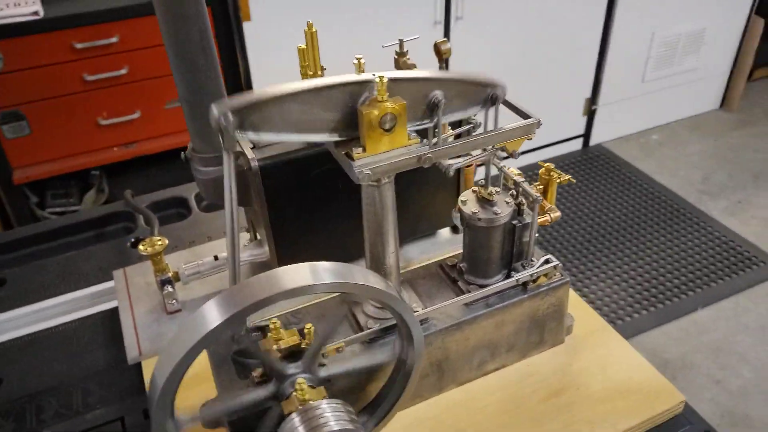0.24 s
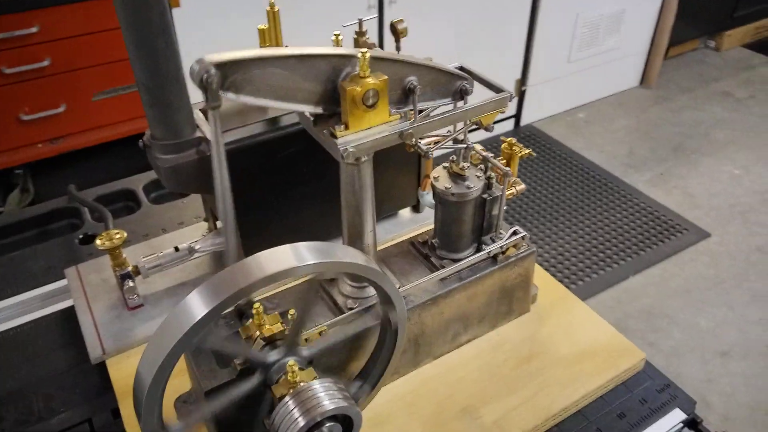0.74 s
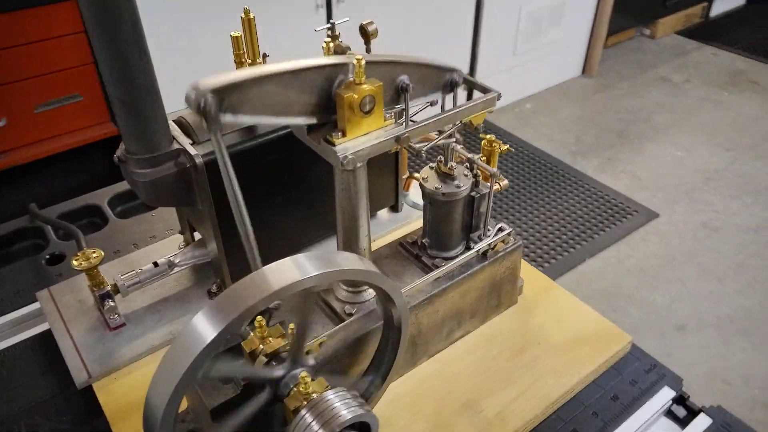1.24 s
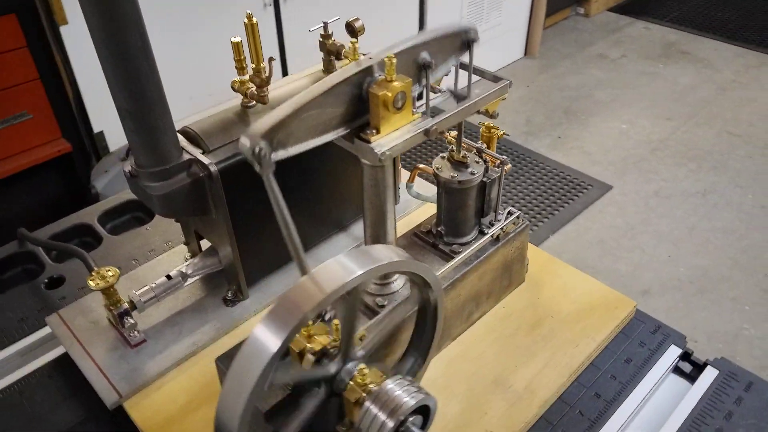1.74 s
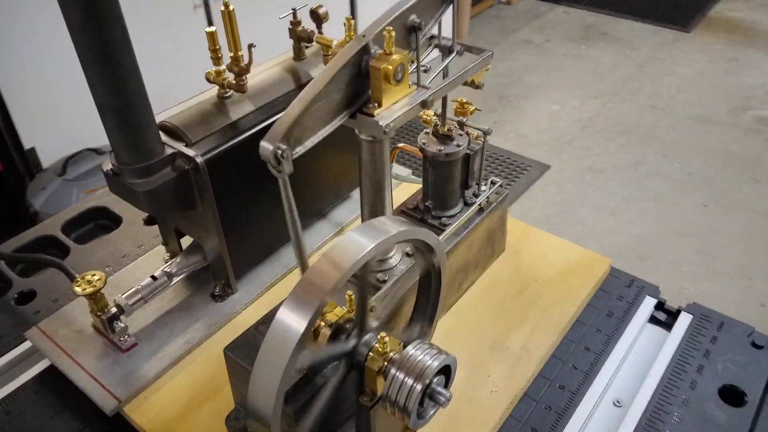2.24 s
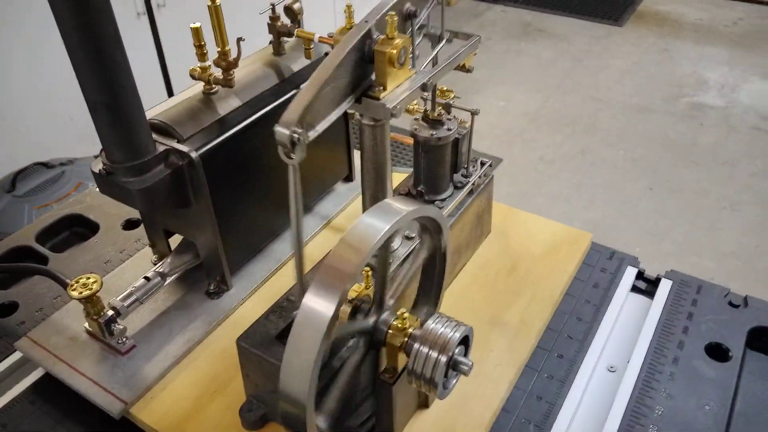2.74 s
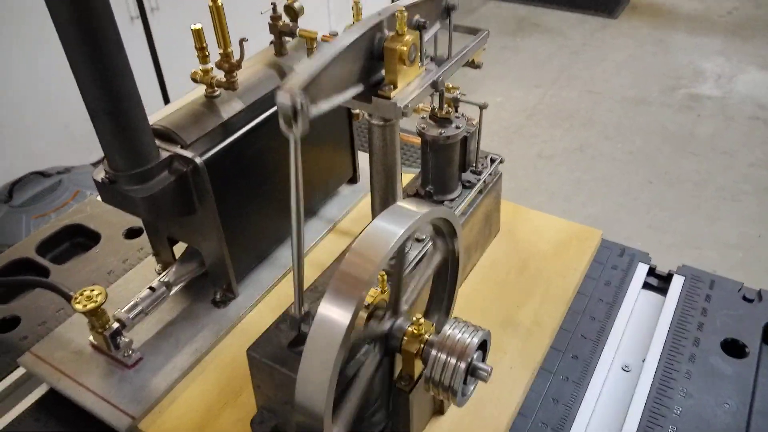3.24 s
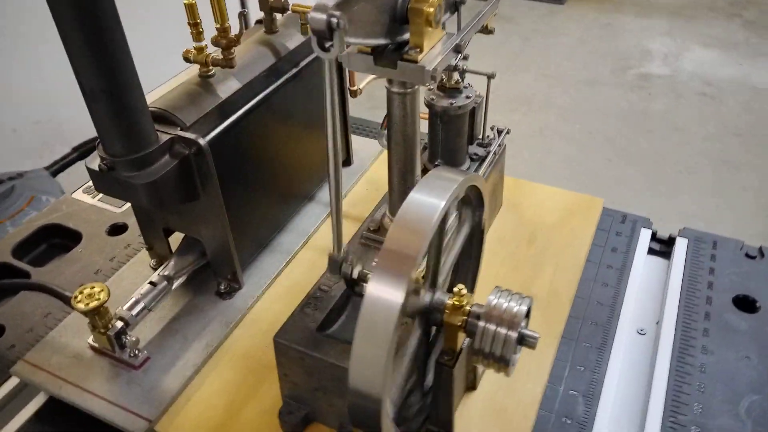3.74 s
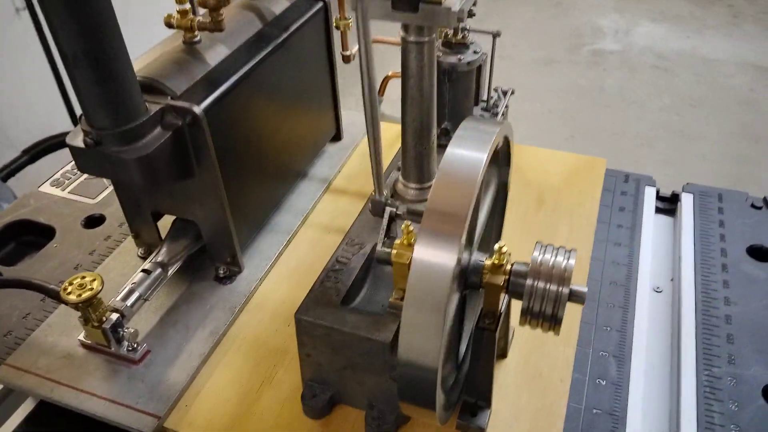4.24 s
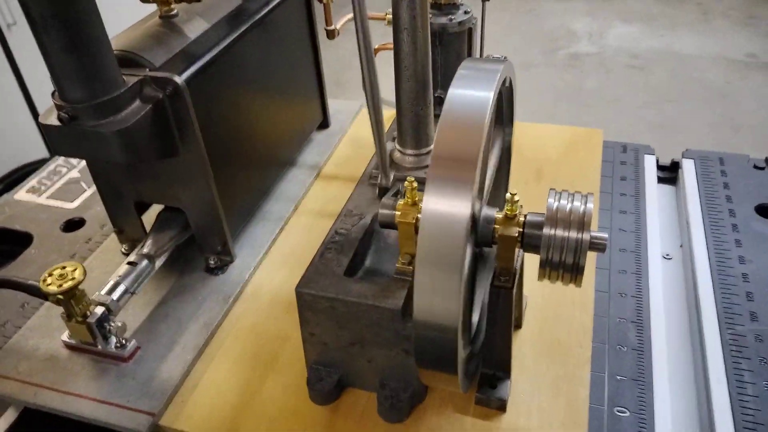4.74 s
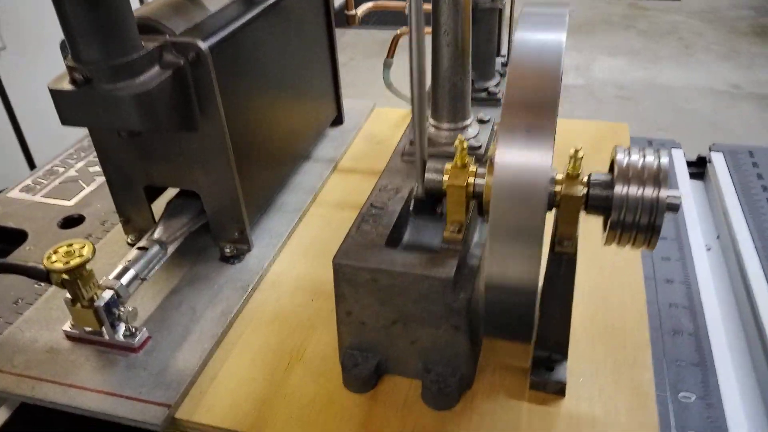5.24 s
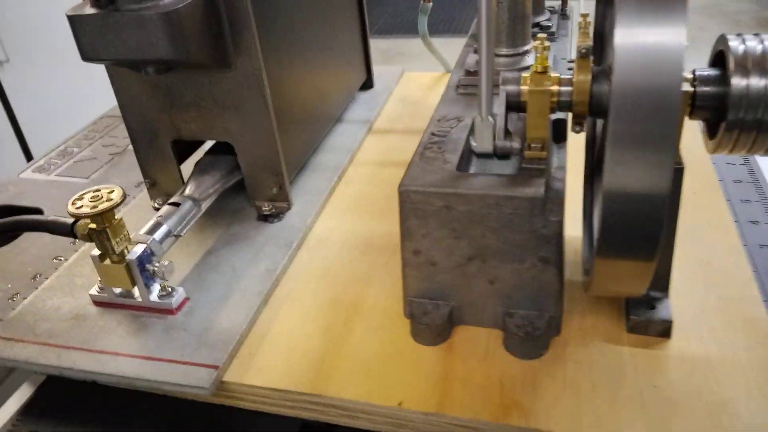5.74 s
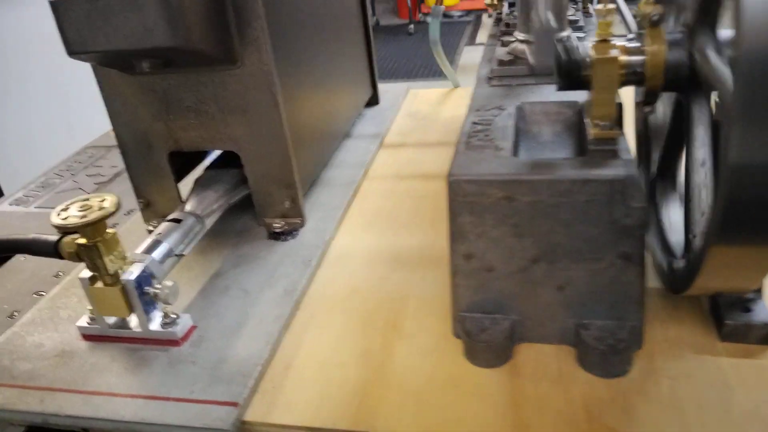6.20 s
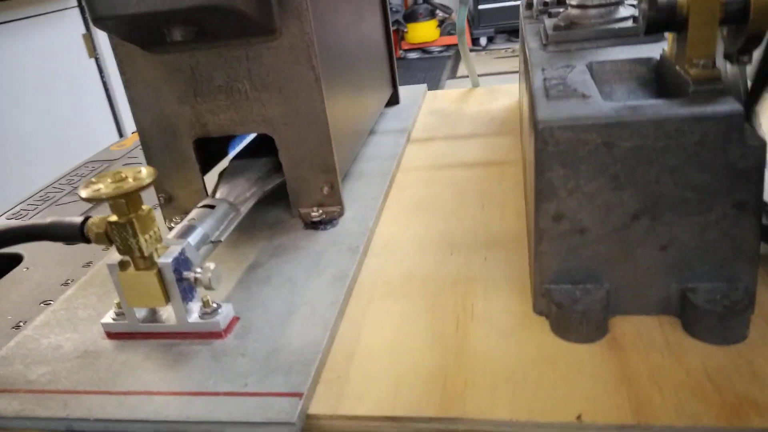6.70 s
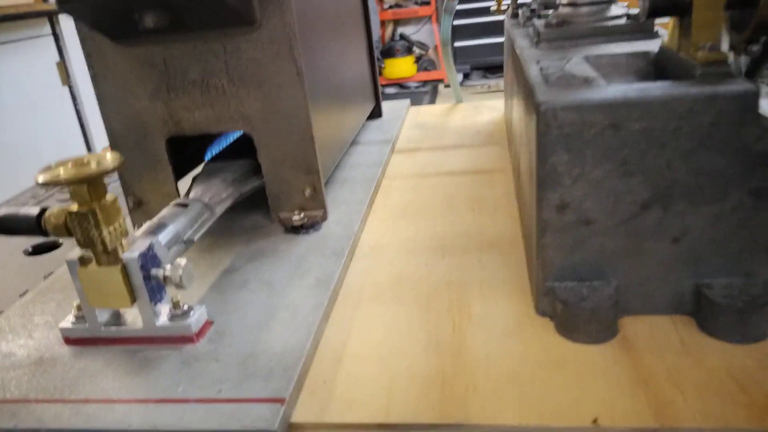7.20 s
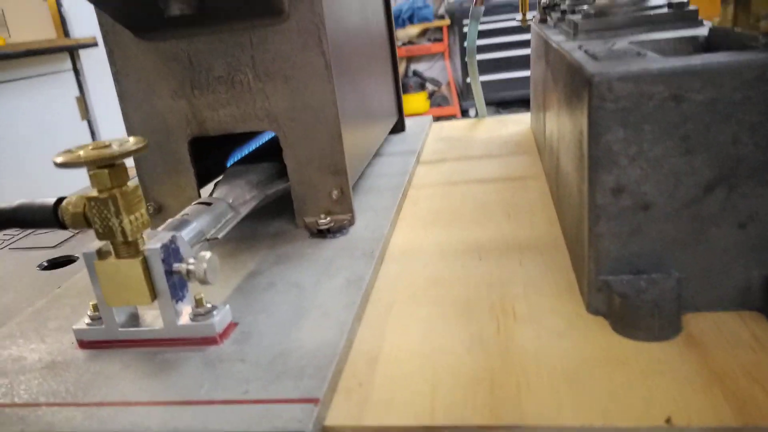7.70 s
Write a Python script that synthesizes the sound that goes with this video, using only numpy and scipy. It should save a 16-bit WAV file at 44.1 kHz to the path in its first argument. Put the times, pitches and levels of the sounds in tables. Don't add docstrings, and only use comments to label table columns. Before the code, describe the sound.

A gas burner hisses steadily and brightly in a workshop while a small steam engine ticks, knocks and faintly puffs; shoes scuff the concrete floor.

```python
import sys
import numpy as np
from scipy import signal
from scipy.fft import rfft, irfft
from scipy.io import wavfile
from scipy.ndimage import uniform_filter1d

SR = 44100
rng = np.random.default_rng(int(sys.argv[2]) if len(sys.argv) > 2 else 0)


def pcm_store(signal):
    levels = np.round(np.clip(np.atleast_2d(signal), -1, 1) * 32767)
    wavfile.write(sys.argv[1], SR, levels.astype(np.int16).T)


def amplitude_ratio(level_db):
    exponent = np.asarray(level_db, float) / 20
    return 10 ** exponent


N = 351036
FRAME = 1024


def unit(x):
    return x / np.sqrt(np.mean(np.abs(x) ** 2) + 1e-20)


def along(points, hz):
    f, v = np.transpose(points)
    return np.interp(np.log(hz + 1), np.log(f + 1), v)


def curves(rows, t):
    s, *cols = np.transpose(rows)
    return [np.interp(t, s, c) for c in cols]


def frames(x):
    hz, t, z = signal.stft(x, SR, nperseg=FRAME, noverlap=FRAME * 5 // 8)
    return hz[:, None], t, z


def samples(z):
    return signal.istft(z, SR, nperseg=FRAME, noverlap=FRAME * 5 // 8)[1][..., :N]


def patches(shape, bins, steps):
    field = rng.standard_normal(shape)
    for _ in range(2):
        field = uniform_filter1d(field, bins, axis=-2)
        field = uniform_filter1d(field, steps, axis=-1)
    return unit(field)


def glide(row, hz, t, fade_s):
    start, end, hz0, hz1, width_hz = row[:5]
    fade = np.clip(np.minimum(t - start, end - t) / fade_s + 0.5, 0, 1)
    on = fade > 0
    centre_hz = hz0 + (hz1 - hz0) * (t[on] - start) / (end - start)
    return on, fade[on], (hz - centre_hz) / width_hz


def burner():
    # f/Hz, level/dB per Hz
    jet_spectrum = [(900, -50.5), (1800, -32.5), (2600.0, -15.5), (3300.0, -7.0), (4000.0, -2.5),
                    (4600.0, 4.5), (6000.0, -0.5), (7500.0, -3.5), (9000.0, -4.5), (12000.0, -6.0),
                    (14000.0, -3.5), (15400.0, -11.5), (15650, -14)]
    # t/s, left level/dB, left tilt/dB per octave, right level/dB, right tilt/dB per octave
    walk = [(0.0, -3.5, 8, 3.5, -8), (0.62, -6, 5.5, 5.5, -5.5), (0.69, -8.5, 14, 2.5, -2.5),
            (1.09, -11.5, 7.5, 1.3, -4.5), (1.45, -10.5, 11, 3, -6.5), (2.17, -3.5, 3.5, 5, -10.5),
            (2.89, 0, 3, 7, -8.5), (3.12, 3.8, 3, 7.5, -7.5), (3.3, -4, 7.5, 3, -4),
            (3.6, -1, 4.5, 6.5, -4.5), (4.3, -6, 6.5, 2, -2), (5.07, -3, 9.5, 6, -3),
            (5.43, -4.5, 7.5, 4.5, -5), (6.15, -1.9, 10, 5, -4), (6.7, 0, 10, 2.6, -8),
            (7.1, 1.7, 6.5, 1.5, -6), (7.6, 3.5, 3.5, 5.5, -9), (7.96, 5.5, 2, 6, -10.5)]
    # t/s, lag/ms
    lag_ms = [(0, 0.13), (1.5, 0.21), (3, 0.21), (5, 0.26), (6.3, 0.227), (7.3, 0.76), (8, 0.14)]
    # f/Hz, left level/dB, right level/dB
    shade = [(2180, 1.5, -9), (3100, 10.5, -9), (3780, 4, -8.5), (4910, 2.5, -6), (6240, 1, 3.5),
             (9360, 0.65, -3), (14150, 0.5, -4.5), (15770, 3.5, 8.5)]
    level_db, diffuse = -42, 0.13

    hz, t, z = frames(rng.standard_normal((3, N)))
    left_db, left_tilt, right_db, right_tilt = curves(walk, t)
    octaves = np.log2(np.clip(hz, 1500, None) / 7000)
    db = np.array([left_db + left_tilt * octaves, right_db + right_tilt * octaves])
    db += np.array(curves(shade, hz))
    db += fine_fringes(t) + wide_fringes(hz, t)
    db += 0.6 * octaves.clip(0) * patches((1, len(t)), bins=1, steps=5)
    jet = np.sqrt(1 - diffuse) * z[0] + np.sqrt(diffuse) * z[1:]
    half_lag_s = curves(lag_ms, t)[0] / 1000 / 2
    lag = np.exp(-2j * np.pi * hz * half_lag_s * [[[1]], [[-1]]])
    jet = jet * lag * detours(hz, t) * amplitude_ratio(along(jet_spectrum, hz) + db)
    return amplitude_ratio(level_db) * unit(samples(jet))


def detours(hz, t):
    # t/s, bench path/cm, bench strength/0-1, base path/cm, base strength/0-1
    near_left = [(0.0, 11.5, 0.2, 16.0, 0.23), (0.5, 10.9, 0.25, 16.0, 0.32), (1.0, 10.8, 0.31, 16.3, 0.25),
                 (1.49, 10.8, 0.18, 14.4, 0.03), (1.99, 9.3, 0.28, 13.5, 0.17),
                 (2.49, 8.7, 0.41, 13.3, 0.06), (2.98, 8.8, 0.24, 13.3, 0.09),
                 (3.48, 8.5, 0.27, 12.9, 0.38), (3.98, 8.2, 0.24, 12.9, 0.23),
                 (4.48, 8.9, 0.35, 12.6, 0.23), (4.97, 8.5, 0.36, 11.9, 0.16),
                 (5.47, 7.6, 0.95, 10.8, 0.72), (5.97, 7.1, 0.29, 9.7, 0.26), (6.47, 6.6, 0.35, 9.7, 0.22),
                 (6.96, 6.8, 0.57, 8.8, 0.57), (7.46, 6.8, 0.95, 9.1, 0.17), (7.96, 6.2, 0.54, 9.8, 0.38)]
    # t/s, bench path/cm, bench strength/0-1, base path/cm, base strength/0-1
    near_right = [(0.0, 4.8, 0.3, 6.3, 0.22), (0.5, 4.3, 0.48, 9.0, 0.14), (1.0, 4.3, 0.69, 8.4, 0.39),
                  (1.49, 4.2, 0.05, 8.1, 0.22), (1.99, 5.7, 0.1, 6.7, 0.35), (2.49, 9.0, 0.21, 4.6, 0.07),
                  (2.98, 9.0, 0.66, 5.1, 0.51), (3.48, 9.2, 0.75, 5.5, 0.51), (3.98, 9.1, 0.88, 5.6, 0.33),
                  (4.48, 9.1, 0.95, 5.2, 0.3), (4.97, 9.9, 0.31, 4.7, 0.15), (5.47, 11.1, 0.41, 7.3, 0.21),
                  (5.97, 10.9, 0.29, 6.7, 0.17), (6.47, 12.2, 0.42, 7.8, 0.4),
                  (6.96, 11.9, 0.11, 7.9, 0.46), (7.46, 14.7, 0.33, 7.9, 0.14),
                  (7.96, 14.3, 0.57, 8.1, 0.48)]
    echo_gain, sound_cm_per_s = 1.15, 34300
    combs = []
    for near in (near_left, near_right):
        bench_cm, bench, base_cm, base = curves(near, t)
        echoes = bench * np.exp(-2j * np.pi * hz * bench_cm / sound_cm_per_s)
        echoes = echoes + base * np.exp(-2j * np.pi * hz * base_cm / sound_cm_per_s)
        combs.append(1 + echo_gain * echoes)
    return np.array(combs)


def wide_fringes(hz, t):
    # start t/s, end t/s, first f/Hz, last f/Hz, level/dB
    broader_left = [(-0.93, 1.67, 4110.0, 3460.0, 7.0), (-0.53, 1.27, 7550.0, 7100.0, 14.5),
                    (-0.51, 0.69, 5900.0, 5300.0, 9.0), (-0.46, 2.14, 4460.0, 3810.0, 7.5),
                    (-0.41, 3.19, 5470.0, 3670.0, -4.0), (-0.25, 0.25, 8570.0, 8320.0, -12.5),
                    (-0.21, 0.59, 6660.0, 6260.0, -9.0), (-0.13, 3.47, 6530.0, 7430.0, -8.5),
                    (-0.13, 3.47, 12320.0, 11960.0, -5.5), (-0.13, 3.47, 13500.0, 14400.0, -10.5),
                    (-0.04, 3.56, 15340.0, 14980.0, 5.0), (0.24, 3.84, 13070.0, 13970.0, -8.5),
                    (0.51, 1.71, 8480.0, 7880.0, 7.5), (0.74, 3.34, 10380.0, 11680.0, -5.0),
                    (1.89, 2.39, 9110.0, 8980.0, 11.5), (1.92, 5.52, 6440.0, 7340.0, 6.0),
                    (1.95, 4.55, 4520.0, 5820.0, -7.0), (1.95, 4.55, 5470.0, 6770.0, 5.0),
                    (2.1, 5.7, 7730.0, 8630.0, -9.5), (2.19, 5.79, 4750.0, 4390.0, -3.5),
                    (2.65, 3.85, 2970.0, 3570.0, -8.0), (3.22, 6.82, 4100.0, 5900.0, 7.0),
                    (3.56, 5.36, 8730.0, 9180.0, -9.5), (4.18, 6.78, 5000.0, 5000.0, 4.0),
                    (4.34, 5.14, 9710.0, 10110.0, 13.5), (4.43, 5.23, 5810.0, 6930.0, -10.5),
                    (4.71, 5.51, 13360.0, 13160.0, -8.0), (5.07, 6.27, 11410.0, 12010.0, 8.0),
                    (5.17, 5.97, 7190.0, 8310.0, 11.0), (5.17, 8.77, 3620.0, 3620.0, -7.0),
                    (5.23, 5.73, 15140.0, 15010.0, 13.5), (5.45, 6.25, 5580.0, 6300.0, -7.5),
                    (5.57, 8.17, 7990.0, 7340.0, 7.0), (5.6, 6.1, 3990.0, 4110.0, 10.0),
                    (5.92, 6.72, 3050.0, 2970.0, 13.0), (6.22, 8.82, 4350.0, 5650.0, -5.5),
                    (6.59, 9.19, 9110.0, 8460.0, 7.0), (6.62, 7.12, 3770.0, 3640.0, 9.5),
                    (6.9, 7.4, 9810.0, 10510.0, -11.0), (7.03, 7.83, 2480.0, 3200.0, -9.0)]
    # start t/s, end t/s, first f/Hz, last f/Hz, level/dB
    broader_right = [(-0.22, 3.38, 2670.0, 2670.0, -5.5), (-0.06, 1.74, 7150.0, 7150.0, -7.0),
                     (0.05, 1.25, 3300.0, 3600.0, 8.0), (0.06, 3.66, 9020.0, 9920.0, -8.0),
                     (0.21, 2.01, 8090.0, 8270.0, -7.0), (0.24, 3.84, 6010.0, 6910.0, -6.0),
                     (0.4, 0.9, 8490.0, 8740.0, 10.5), (0.43, 4.03, 14320.0, 13420.0, -11.0),
                     (1.45, 5.05, 13710.0, 12810.0, -6.5), (1.49, 4.09, 14860.0, 15120.0, 7.0),
                     (1.54, 2.74, 5620.0, 5740.0, -6.0), (1.74, 2.54, 7520.0, 7120.0, 11.0),
                     (1.82, 5.42, 11110.0, 11110.0, -4.5), (2.29, 3.09, 10260.0, 10060.0, 12.0),
                     (2.35, 4.15, 3360.0, 3360.0, -9.0), (2.35, 4.15, 7830.0, 8010.0, -11.0),
                     (2.35, 4.15, 8650.0, 9100.0, -5.0), (2.38, 5.98, 5250.0, 5610.0, 3.5),
                     (3.0, 4.8, 6310.0, 5410.0, 9.0), (3.49, 4.69, 5020.0, 6700.0, 6.5),
                     (3.49, 7.09, 4930.0, 4030.0, -6.0), (3.62, 6.22, 2800.0, 4100.0, 5.0),
                     (4.18, 6.78, 8910.0, 10210.0, 8.0), (4.3, 4.8, 4870.0, 5120.0, -11.5),
                     (4.52, 8.12, 12180.0, 10380.0, 9.5), (4.67, 6.47, 3840.0, 5460.0, -5.0),
                     (5.04, 6.84, 8120.0, 7220.0, 9.5), (5.11, 7.71, 11330.0, 10030.0, 8.5),
                     (5.2, 7.8, 14880.0, 14230.0, -8.0), (5.25, 6.45, 13580.0, 13460.0, 9.5),
                     (5.26, 8.86, 6810.0, 6450.0, -7.0), (5.27, 6.07, 5730.0, 6850.0, -7.5),
                     (6.29, 7.09, 8080.0, 8280.0, -10.0), (6.34, 6.84, 6660.0, 6780.0, 13.0),
                     (6.34, 8.14, 15300.0, 14850.0, 11.0), (6.53, 7.03, 9690.0, 9440.0, 14.0),
                     (6.72, 8.52, 4790.0, 6410.0, -8.0), (6.81, 7.31, 5900.0, 6150.0, 10.0),
                     (7.11, 8.31, 3120.0, 3420.0, 8.0), (7.18, 7.68, 8390.0, 8140.0, 12.0)]
    # start t/s, end t/s, first f/Hz, last f/Hz, level/dB
    narrower_left = [(-0.2, 1.4, 2240, 2240, -8.0), (-0.05, 0.95, 3960, 4060, -10.5),
                     (-0.05, 0.95, 7410, 7310, -11.5), (0.1, 1.1, 5510, 5610, -9.5),
                     (0.1, 1.1, 9560, 9460, 12.5), (0.1, 2.5, 6200, 6200, 7.5),
                     (1.15, 4.55, 8790, 9640, -5.5), (1.45, 2.45, 6980, 7080, 8.5),
                     (1.45, 4.85, 2150, 2150, -7.5), (2.8, 3.8, 4570, 4670, -7.5),
                     (3.7, 6.1, 4050, 4290, 5.5), (4.15, 7.55, 5770, 6620, 6.5), (4.3, 5.9, 8270, 8670, 9.0),
                     (4.6, 7.0, 5250, 6450, 5.5), (5.2, 6.8, 2150, 2310, 6.5), (5.2, 8.6, 8100, 7250, -5.5),
                     (5.2, 6.2, 7300, 8500, -7), (6.3, 7.7, 9000, 12000, -8), (2.3, 3.4, 9900, 9700, -7),
                     (6.2, 7.3, 4400, 4600, 5)]
    # start t/s, end t/s, first f/Hz, last f/Hz, level/dB
    narrower_right = [(-0.2, 3.2, 9820.0, 10160.0, -8.5), (-0.05, 0.95, 8180.0, 8680.0, -11.0),
                      (0.55, 2.95, 4650.0, 4050.0, -5.5), (2.05, 4.45, 3450.0, 3690.0, 5.0),
                      (2.8, 5.2, 6460.0, 5260.0, -5.5), (4.9, 7.3, 8270.0, 7070.0, -5.5),
                      (5.35, 7.75, 6980.0, 8180.0, -8.0), (5.5, 8.9, 2500.0, 2160.0, -6.5),
                      (5.8, 7.4, 3190.0, 3190.0, 6.0), (6.25, 7.85, 5940.0, 6340.0, -11.0),
                      (6.4, 8.8, 10590.0, 10830.0, -10.0), (6.85, 7.45, 6720.0, 6870.0, 11.5),
                      (6.85, 8.45, 9300.0, 10740.0, -10.5), (4.3, 5.3, 6700, 7500, 5),
                      (6.2, 7.3, 4500, 4700, 5)]
    # start t/s, end t/s, first f/Hz, last f/Hz, level/dB
    thin = [
        (2, 4.6, 3400, 3450, -6),
        (2, 4, 3130, 3100, -7),
        (1.9, 3.3, 4780, 4760, -8),
        (.2, 1, 5750, 5750, -6),
        (5.3, 6.8, 3600, 3680, -7),
        (6.1, 7.6, 3950, 4150, -6),
        (3.6, 5.3, 2330, 2330, -9),
    ]
    db = np.array([fringes(rows, 240, hz, t) for rows in (broader_left, broader_right)])
    db += [fringes(rows, 170, hz, t) for rows in (narrower_left, narrower_right)]
    return db + fringes(thin, 110, hz, t)


def fringes(rows, width_hz, hz, t):
    db = np.zeros((len(hz), len(t)))
    for start, end, hz0, hz1, depth_db in rows:
        on, fade, off = glide((start, end, hz0, hz1, width_hz), hz, t, fade_s=0.3)
        db[:, on] += depth_db * fade * np.exp(-off ** 2)
    return db


def fine_fringes(t):
    # t/s, left factor, right factor
    stretch = [(0, 1, 1), (4.3, 1.06, 1), (5.2, 1.15, 1.04), (8, 1.7, 1.3)]
    depth_db = 4.6
    fields = patches((2, FRAME // 2 + 1, len(t)), bins=2, steps=30)
    rows = np.arange(FRAME // 2 + 1)[:, None]
    fields = [np.take_along_axis(field, (rows / factor).astype(int), axis=0)
              for field, factor in zip(fields, curves(stretch, t))]
    return depth_db * np.minimum(fields, 0.5)


def gear():
    lump_db = 4
    lumps = np.interp(np.linspace(0, 1100, N), np.arange(1200), rng.standard_normal(1200))
    hz, t, z = frames(unit(amplitude_ratio(lump_db * lumps) * rng.standard_normal(N)))
    power = np.zeros(z.shape)
    for row in strokes():
        on, fade, off = glide(row, hz, t, fade_s=0.098)
        power[:, on] += amplitude_ratio(row[5] + 27.5) ** 2 * fade ** 2 * np.exp(-off ** 2)
    grain_db = lump_db * patches(z.shape, bins=3, steps=3) - 2.5
    return samples(np.sqrt(power) * amplitude_ratio(grain_db) * z)


def strokes():
    # start t/s, length/s, level/dB
    puffs = [(0.738, 0.22, -77.5), (2.18, 0.18, -78), (2.522, 0.14, -81.5), (2.878, 0.22, -78.5),
             (3.718, 0.19, -76), (4.56, 0.19, -79), (5.034, 0.42, -77.5), (6.264, 0.13, -78.5),
             (6.519, 0.28, -71), (7.002, 0.79, -80), (7.767, 0.13, -68.5)]
    # start t/s, length/s, f/Hz, level/dB
    rubs = [(.08, 0.11, 1630, -76.5), (.3, 0.67, 1250, -81), (.98, 0.29, 870, -85), (1.44, 0.1, 910, -85.5),
            (1.66, 0.22, 1330, -80.5), (2.34, 0.4, 1650, -87.5), (2.62, 0.23, 1060, -88),
            (2.97, 0.096, 1730, -78), (3.15, 0.16, 1340, -80.5), (3.5, 0.21, 1820, -89.5),
            (4.57, 0.17, 805, -84.5), (4.98, 0.12, 1180, -81), (5.73, 0.13, 980, -84.5),
            (6.05, 0.14, 1040, -80), (6.35, 0.31, 1240, -83.5), (6.68, 0.24, 665, -85),
            (7.03, 0.56, 1135, -83.5), (7.58, 0.47, 1130, -76.5)]
    # start t/s, length/s,
    # f/Hz, level/dB
    sings = [(.37, 0.18, 1010, -68.5), (.72, 0.2, 1004, -69), (1.07, 0.22, 2510, -75.5),
             (1.9, 0.19, 1010, -72), (2.15, 0.35, 1350, -83.5), (2.41, 0.23, 2450, -86.5),
             (3.73, 0.6, 2090, -86), (4.11, 0.2, 2020, -79.5), (5.24, 0.095, 1404, -74.5),
             (5.43, 0.64, 1660, -79), (5.53, 0.73, 2556, -74.5), (5.61, 0.4, 1660, -79.5),
             (6.54, 0.31, 1520, -75), (6.84, 0.23, 2780, -71), (7.0, 0.33, 1580, -78.5),
             (7.23, 0.33, 2730, -73), (7.6, 0.43, 2800, -90)]
    puff_hz, puff_rise, puff_width_hz = 349, 1.35, 73
    bands = [(s, s + d, puff_hz, puff_hz * puff_rise, puff_width_hz, db) for s, d, db in puffs]
    for rows, width_per_hz in ((rubs, 0.52), (sings, 0.075)):
        bands += [(s, s + d, hz, hz, width_per_hz * hz, db) for s, d, hz, db in rows]
    return bands


def knocks():
    # t/s, peak level/dB, f/Hz
    joints = [(0.15, -48, 1880), (0.307, -61, 643), (0.852, -59, 517), (2.44, -50.5, 1340),
              (2.49, -47.5, 1870), (3.176, -51, 676), (3.562, -57, 1120), (3.778, -68, 395),
              (3.846, -60.5, 394), (3.978, -51, 1310), (4.565, -60, 410), (4.753, -48, 500),
              (4.858, -54, 490), (4.995, -57.5, 590), (5.142, -58.5, 370), (6.385, -58, 450),
              (6.432, -51.5, 760), (6.479, -49, 1100), (6.603, -56, 354), (6.705, -55, 453),
              (6.78, -70, 483), (6.828, -51.5, 790), (7.053, -54, 790), (7.332, -51, 673),
              (7.699, -49.5, 770), (7.773, -53.5, 1470), (7.865, -50.5, 430)]
    # t/s, peak level/dB, f/Hz
    links = [(0.308, -56.5, 620), (0.476, -52, 980), (0.55, -53, 633), (0.61, -46, 980), (0.625, -58, 1026),
             (0.724, -53.5, 1300), (0.752, -49, 990), (0.789, -59, 960), (0.822, -50.5, 1160),
             (0.91, -51, 456), (1.589, -53, 965), (1.69, -60, 630), (1.961, -50, 1036), (2.184, -57.5, 382),
             (2.218, -61.5, 390), (3.573, -52, 1135), (4.594, -57, 440), (5.039, -63, 634),
             (5.179, -58, 344)]
    # t/s, peak level/dB
    pin = [(0.108, -49.5), (0.388, -55), (0.599, -50.5), (0.683, -61), (0.895, -52.5), (1.054, -53),
           (1.131, -58), (1.453, -57), (1.491, -51), (1.557, -52.5), (1.666, -58), (1.722, -53.5),
           (1.776, -49.5), (1.826, -50), (1.926, -52.5), (4.619, -53.5), (6.074, -55.5), (7.809, -49)]
    pin_hz, pin_t60_s, knock_t60_s = 966, 0.045, 0.033
    knock_crack, click_crack = 1.9, 0.97
    rows = [(*row, knock_t60_s, knock_crack) for row in joints]
    rows += [(*row, knock_t60_s, click_crack) for row in links]
    rows += [(s, db, pin_hz, pin_t60_s, click_crack) for s, db in pin]

    out, t = np.zeros(N + SR), np.arange(SR // 10) / SR
    band = signal.butter(2, [280, 2300], "band", fs=SR)
    crack_decay = 0.71 * amplitude_ratio(-60 * t / 0.015) + 1.1 * amplitude_ratio(-60 * t / 0.012)
    for s, db, hz, t60_s, dryness in rows:
        ring = np.sin(2 * np.pi * hz * t) * amplitude_ratio(-60 * t / t60_s) * (1 - np.exp(-t / 0.004))
        crack = signal.lfilter(*band, rng.standard_normal(len(t))) * crack_decay
        out[round(s * SR):][:len(t)] += amplitude_ratio(db + 1.0) * (1.2 * ring + dryness * crack)
    return out[:N]


def shop(x):
    # f/Hz, t60/s
    decay = [(200, 0.33), (2000, 0.18), (10000, 0.044)]
    hz, t, z = signal.stft(rng.standard_normal((2, SR // 2)), SR, nperseg=256)
    tail = signal.istft(z * amplitude_ratio(-60 * t / along(decay, hz)[:, None]), SR, nperseg=256)[1]
    return signal.fftconvolve(x[None], tail / np.linalg.norm(tail[0]), axes=1)[:, :N]


def steps():
    # t/s, length/s, thud level/dB, scrape level/dB
    shoes = [
        (0.122, 0.035, -82, -64),
        (0.643, 0.093, -65, -51.5),
        (2.445, 0.054, -93, -74),
        (3.01, 0.031, -68, -56.5),
        (3.173, 0.069, -54, -43),
        (3.48, 0.016, -59.5, -75),
        (3.502, 0.06, -57.5, -46),
        (3.524, 0.14, -60, -50.5),
        (6.078, 0.038, -61, -53),
    ]
    # f/Hz, level/dB per Hz
    sole = [(500, -11), (1200, 19.5), (2500, 15.5), (6000, 24.5), (11000, 27), (15000, 25), (16000, -60)]
    white = rng.standard_normal((2, N)) * amplitude_ratio(2.7 * rng.exponential(size=(2, N)))
    grit = unit(irfft(rfft(white) * amplitude_ratio(along(sole, np.fft.rfftfreq(N, 1 / SR))), N))
    t, thud, drag = np.arange(N) / SR, np.zeros(N), np.zeros(N)
    for s, length_s, thud_db, scrape_db in shoes:
        u = np.clip(t - s, 0, None)
        thud += amplitude_ratio(thud_db - 60 * u / 0.04) * np.sin(2 * np.pi * 165 * u)
        v = 4 * u / length_s
        drag += amplitude_ratio(scrape_db) * v * np.exp(1 - v)
    return thud + drag * grit


def air():
    # f/Hz, level/dB per Hz
    rumble_spectrum = [(12, -63), (20, 5), (134, 1), (177, -3), (352, -5.5), (659, 3), (874, -5.5),
                       (1310, -5), (2200, -1), (2550, 6), (3250, -9.5), (5500, -120)]
    # f/Hz, level/dB
    mains = [(180, -88), (241, -91)]
    level_db, patch_db, alike = -72.5, 4, 0.8
    common, *own = rng.standard_normal((3, N))
    pair = np.sqrt(alike) * common + np.sqrt(1 - alike) * np.array(own)
    rumble = unit(irfft(rfft(pair) * amplitude_ratio(along(rumble_spectrum, np.fft.rfftfreq(N, 1 / SR))), N))
    hz, _, z = frames(rumble)
    uneven_db = patch_db * (hz > 300) * patches(z.shape[1:], bins=5, steps=8)
    rumble = unit(samples(z * amplitude_ratio(uneven_db)))
    t, hum = np.arange(N) / SR, np.zeros(N)
    for f, db in mains:
        wander = np.cumsum(rng.normal(0, 0.0119, N))
        hum += amplitude_ratio(db) * np.sin(2 * np.pi * f * t + wander)
    return amplitude_ratio(level_db) * rumble + hum


def scene():
    engine = gear() + knocks()
    ports = np.array([np.roll(engine, shift=9), engine]) * amplitude_ratio([[-1.6], [-0.6]])
    return burner() + ports + amplitude_ratio(-6.5) * shop(engine) + steps() + air()


def low_pass(x):
    return signal.sosfilt(signal.butter(12, 15620, fs=SR, output="sos"), x)


def record(dry):
    return low_pass(dry)


dry = scene()
out = record(dry)
pcm_store(out)
```